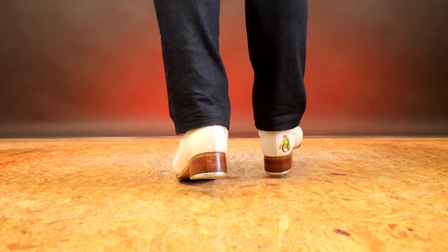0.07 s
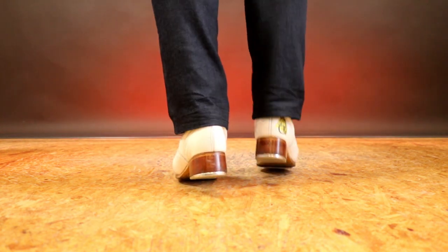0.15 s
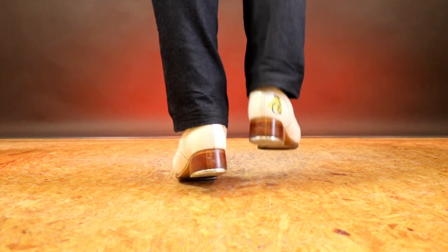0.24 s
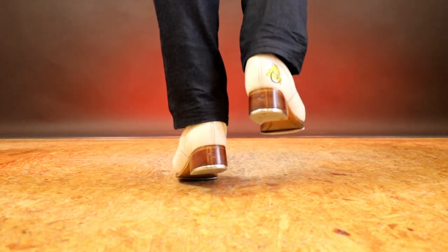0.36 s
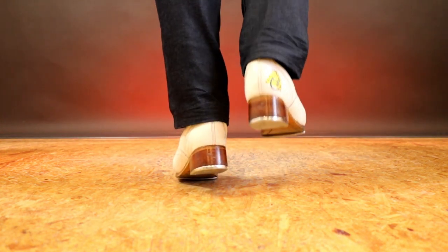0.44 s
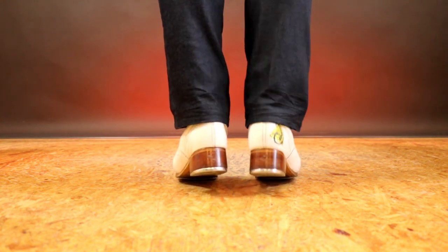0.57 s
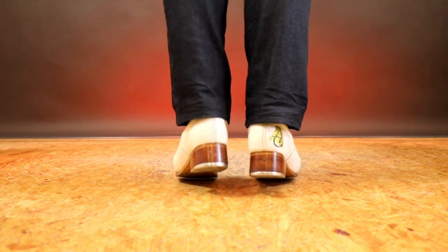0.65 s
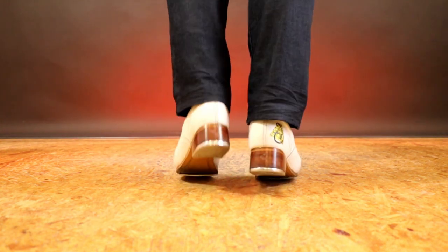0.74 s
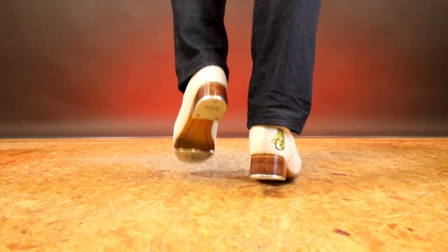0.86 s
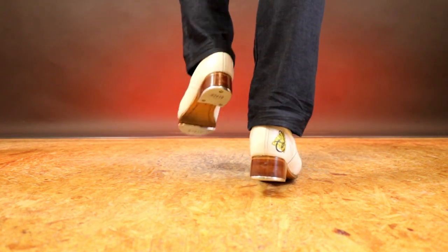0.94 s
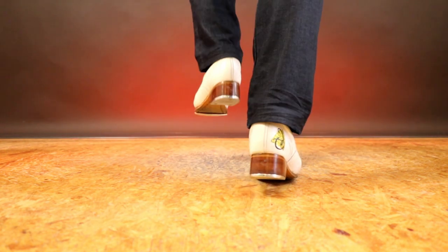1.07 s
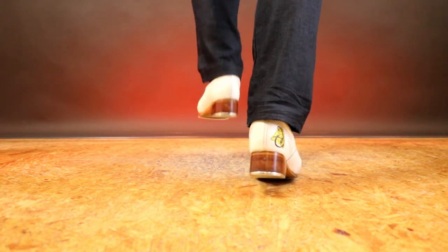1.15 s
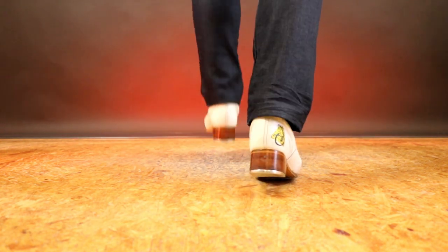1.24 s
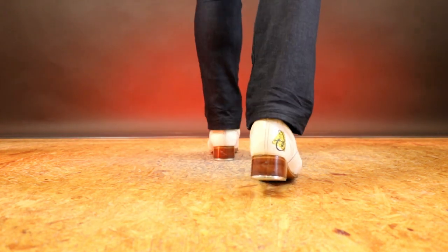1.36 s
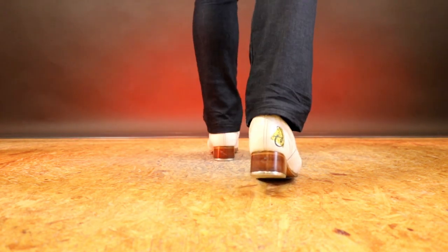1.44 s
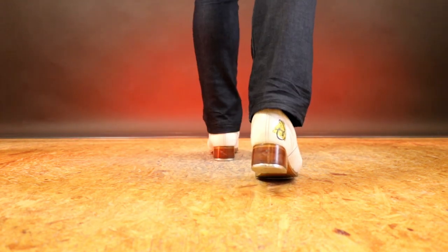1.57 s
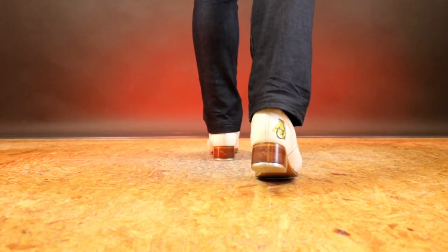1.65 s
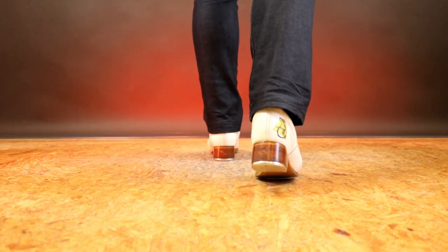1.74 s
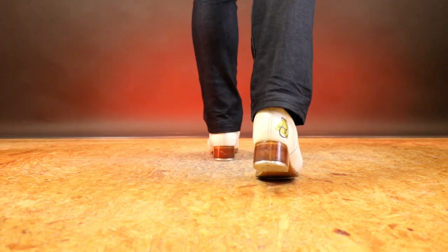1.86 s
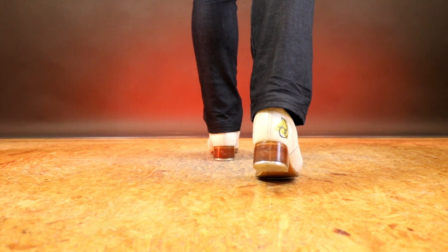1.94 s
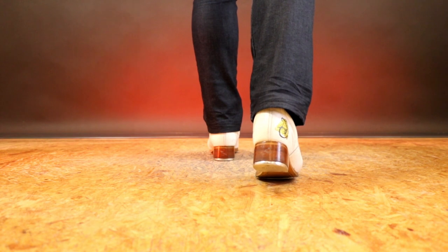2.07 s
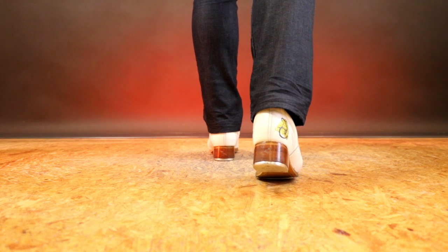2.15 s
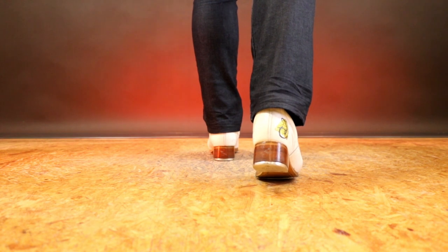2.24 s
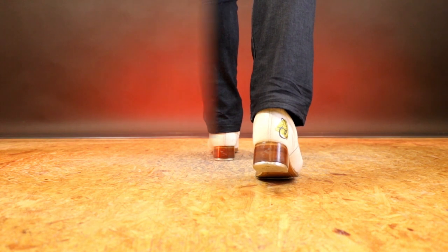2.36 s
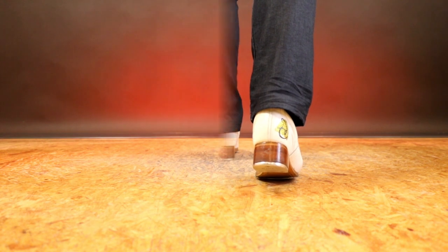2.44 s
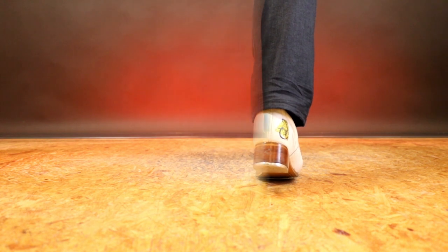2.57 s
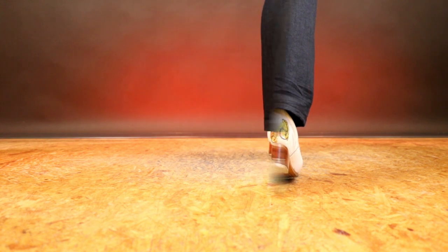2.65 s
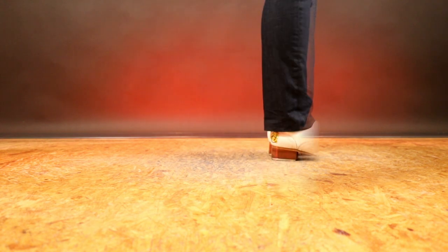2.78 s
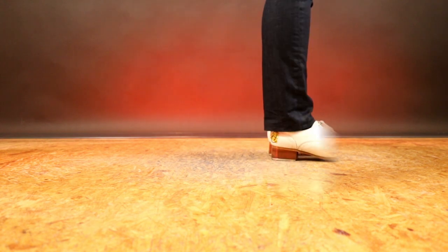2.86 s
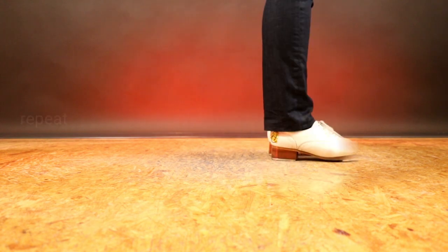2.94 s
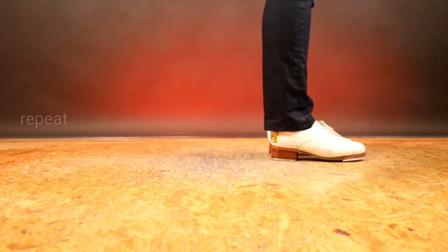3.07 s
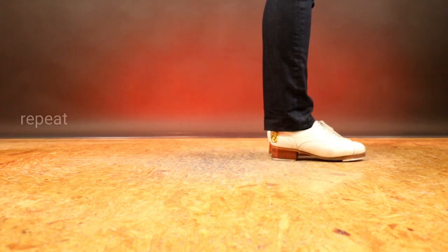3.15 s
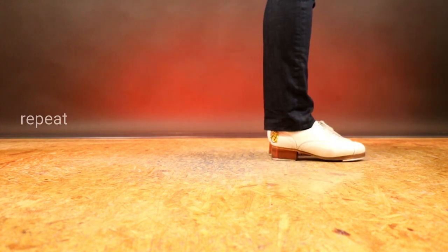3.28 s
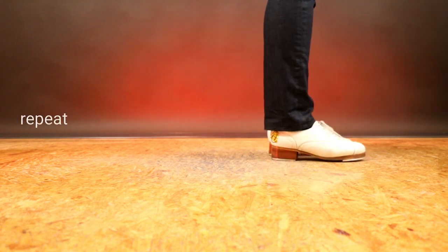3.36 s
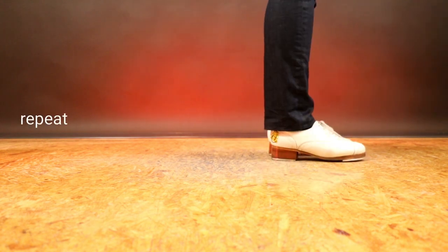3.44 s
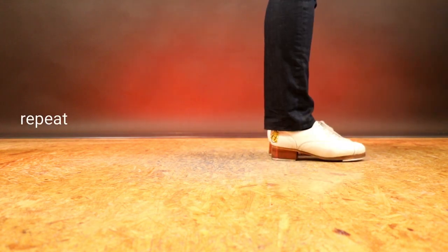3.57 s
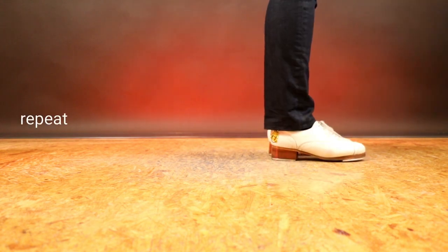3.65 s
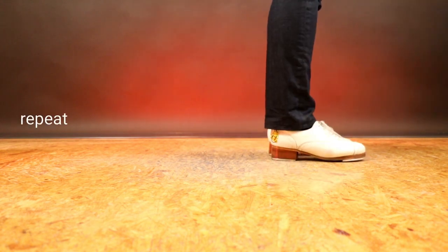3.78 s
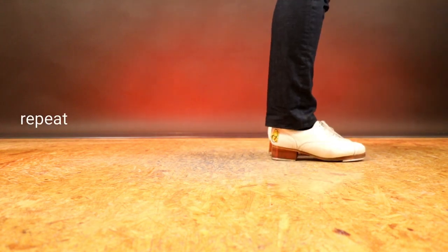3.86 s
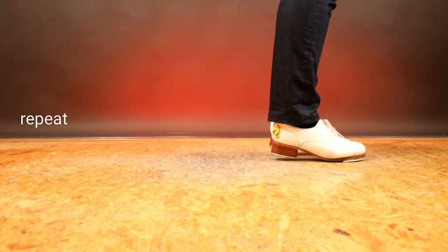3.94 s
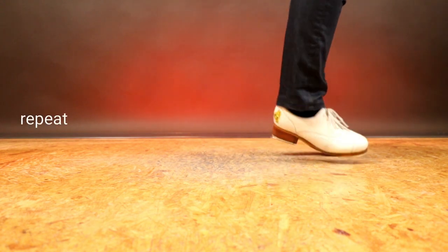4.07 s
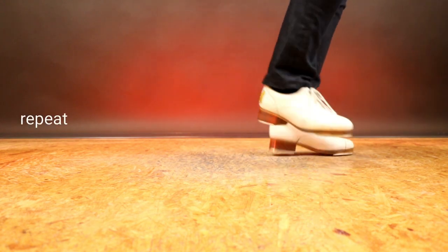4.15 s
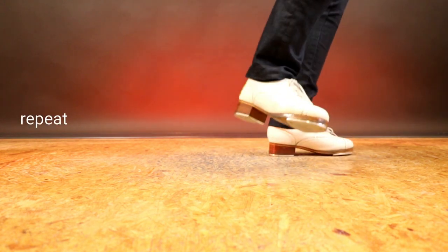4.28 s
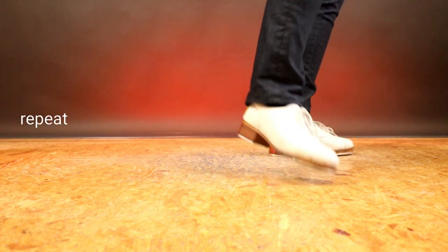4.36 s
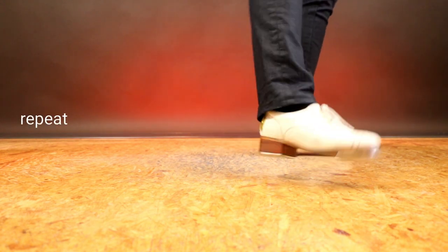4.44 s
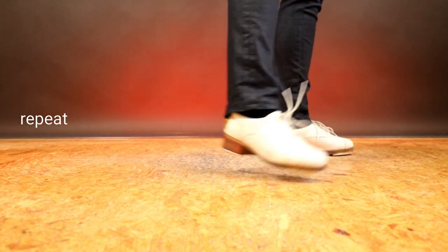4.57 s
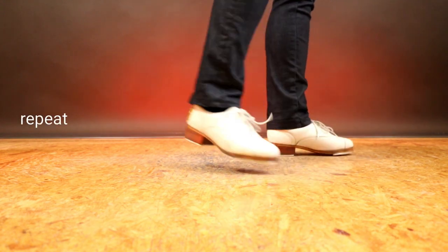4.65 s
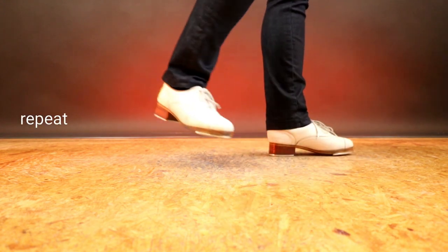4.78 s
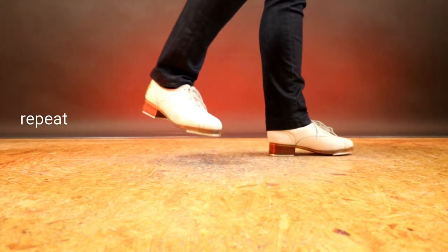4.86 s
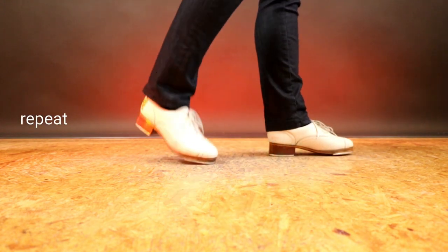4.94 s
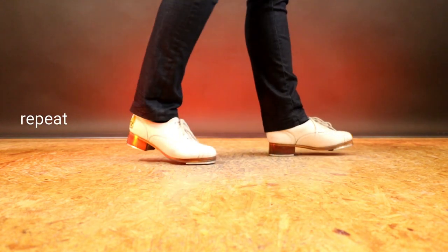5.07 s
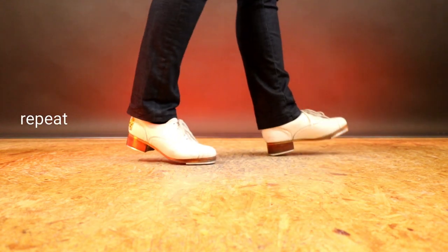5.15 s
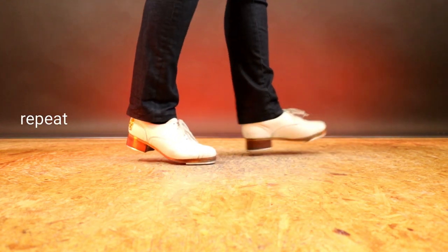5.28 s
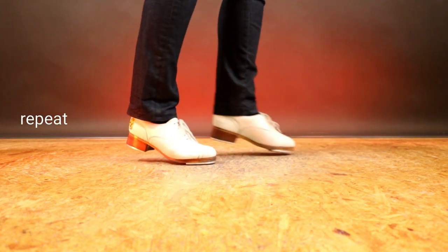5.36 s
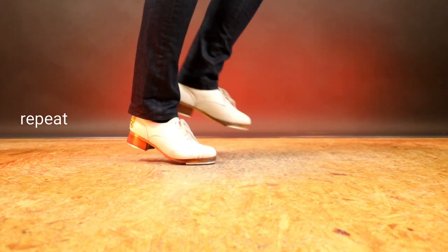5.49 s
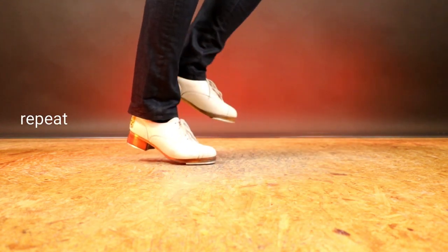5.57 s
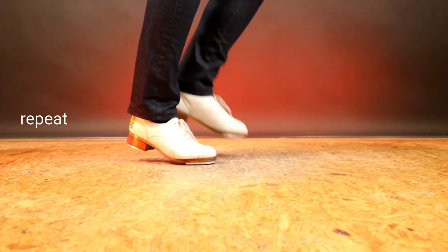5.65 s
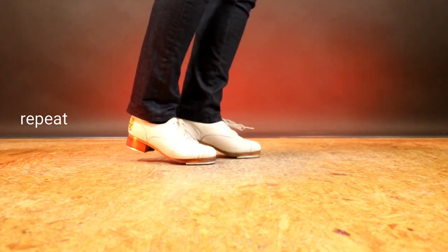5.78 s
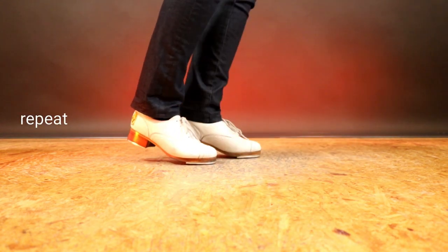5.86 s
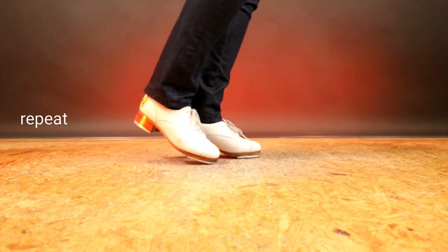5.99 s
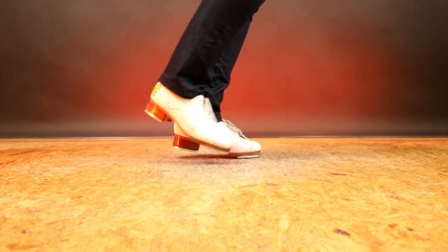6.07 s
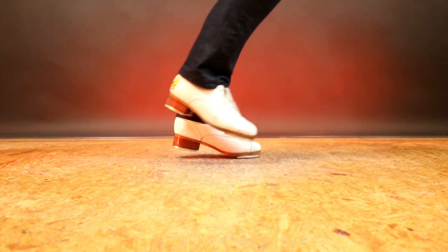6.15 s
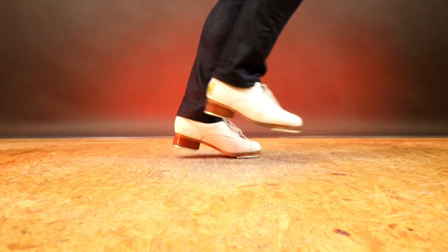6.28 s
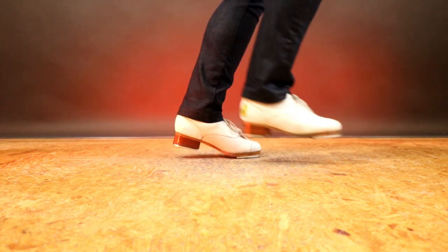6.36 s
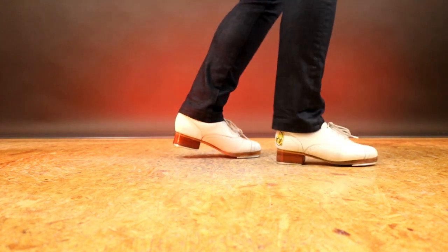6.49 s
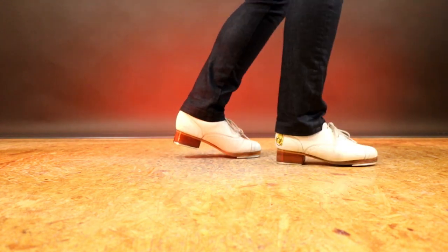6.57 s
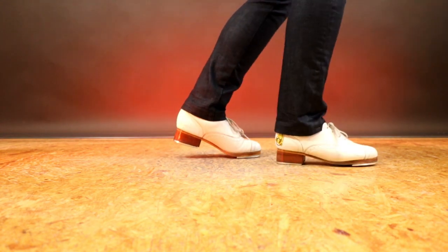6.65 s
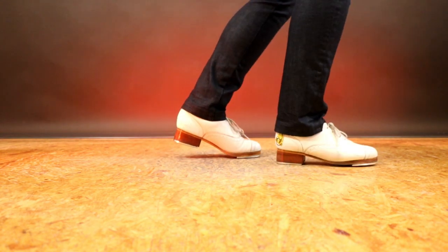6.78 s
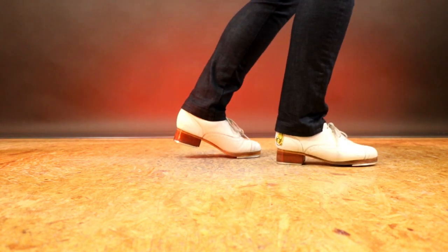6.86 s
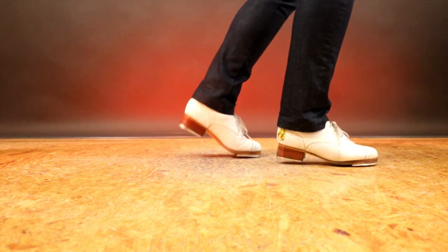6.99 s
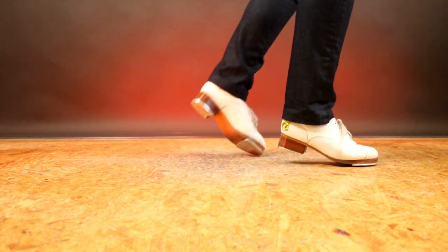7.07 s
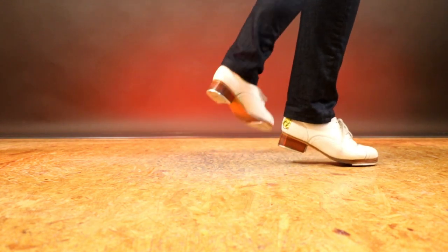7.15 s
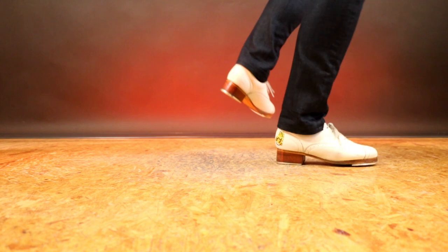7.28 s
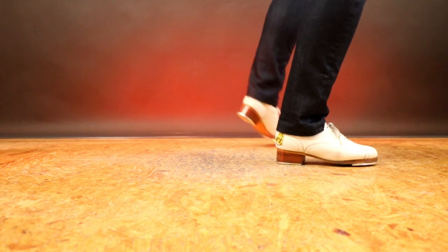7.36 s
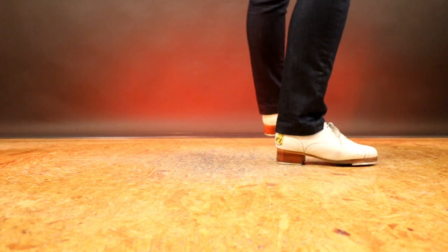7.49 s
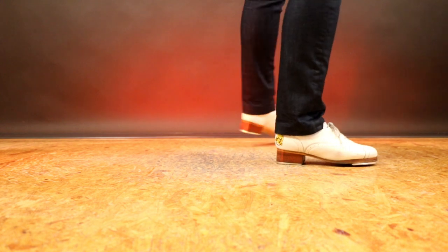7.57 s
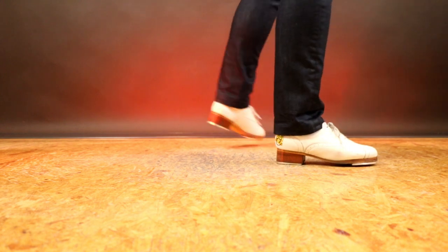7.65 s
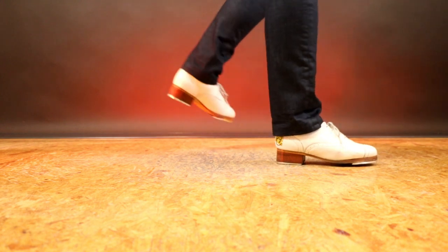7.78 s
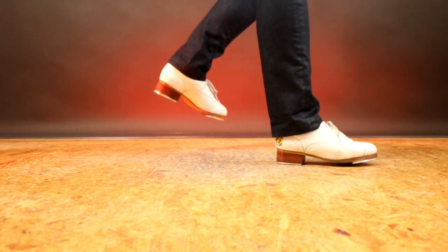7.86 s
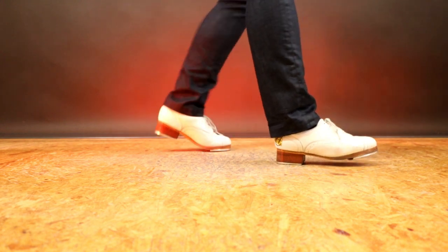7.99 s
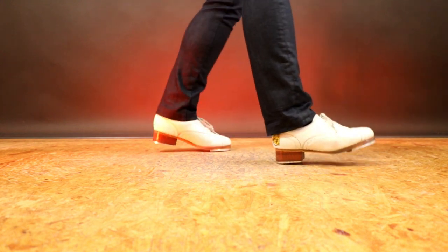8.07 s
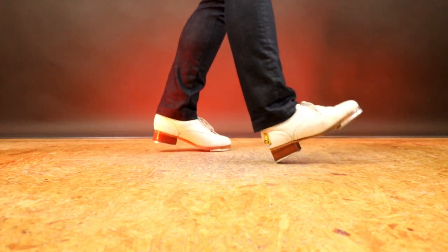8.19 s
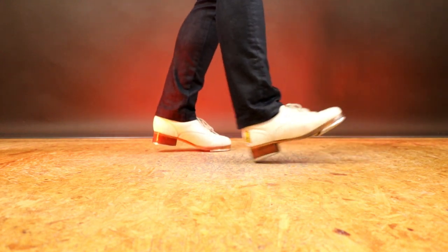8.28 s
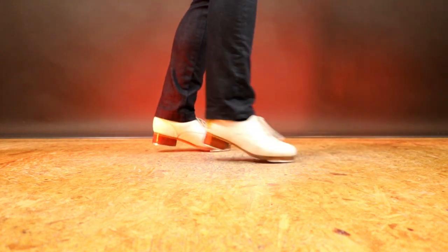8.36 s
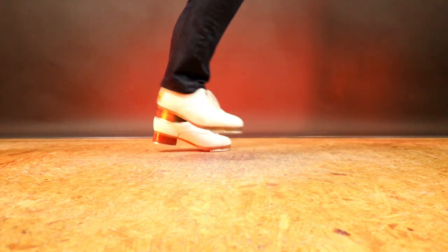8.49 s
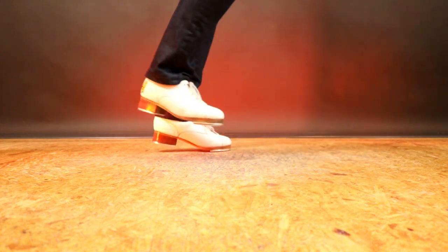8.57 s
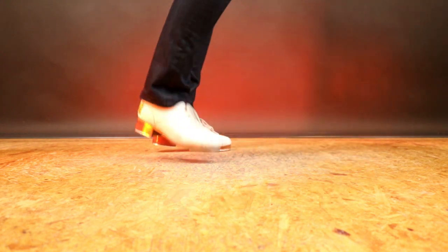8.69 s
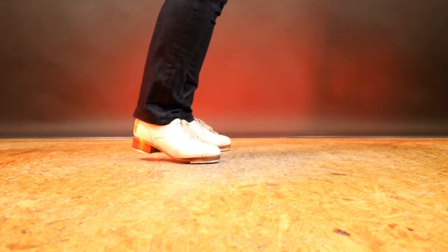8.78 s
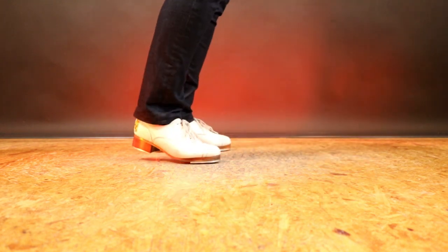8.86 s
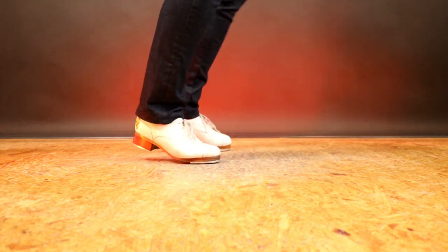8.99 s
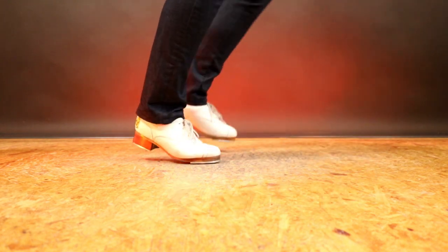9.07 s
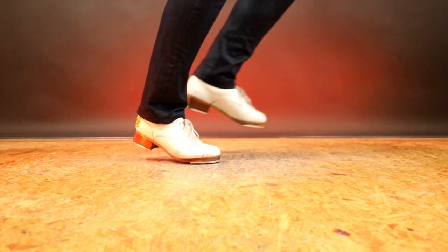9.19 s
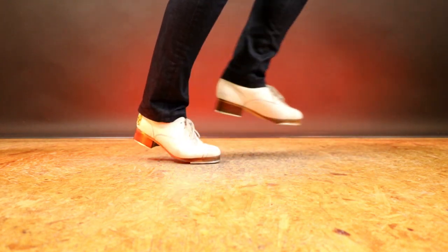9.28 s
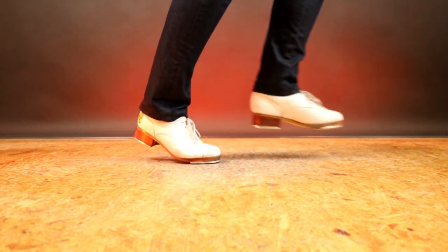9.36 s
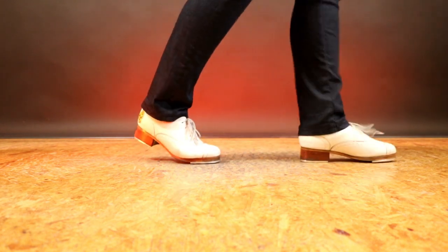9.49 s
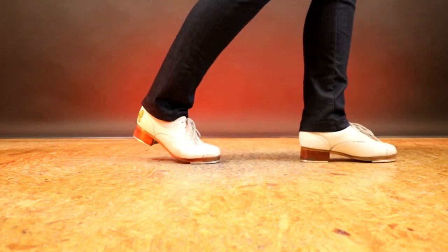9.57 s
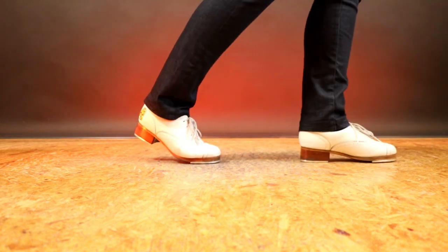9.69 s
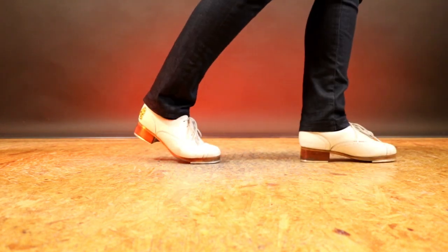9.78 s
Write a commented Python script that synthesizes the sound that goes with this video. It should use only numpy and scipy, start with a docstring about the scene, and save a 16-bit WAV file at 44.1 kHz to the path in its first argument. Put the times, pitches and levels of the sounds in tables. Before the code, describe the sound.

Close stereo pickup of tap shoes on a wooden studio floor. Two single taps and a tight double stamp come first, then nearly three seconds of quiet with a faint sliding sole. Crisp, irregularly spaced taps follow, some stamps landing as fast toe-heel doubles with a light plate rattle. Brief rubbery squeaks slip between them. Each strike rings about half a second in the room over faint hiss.

```python
"""A tap dancer strikes a wooden studio floor with metal-tipped shoes, close to a stereo microphone.
Each tap is one short filtered pulse, coloured by boards and plate; hard ones overload the recorder.
Early echoes and a tail of decaying noise make the room ring on. Some stamps land twice, toe then heel.
Between taps a sole squeaks (wobbling harmonics blurred by noise) and slides (grainy noise).
Plates rattle lightly, over steady hiss and a faint mains hum."""
import sys
import numpy as np
from scipy import signal
from scipy.fft import rfft, irfft
from scipy.io import wavfile
from scipy.ndimage import uniform_filter1d

SR = 44100
rng = np.random.default_rng(int(sys.argv[2]) if len(sys.argv) > 2 else 0)


def waveform_to_disk(signal):
    """Save audio, clipped to [-1, 1], as 16-bit WAV at the path in sys.argv[1]."""
    frames = np.transpose(np.atleast_2d(signal))
    scaled = np.clip(frames, -1, 1) * 32767
    samples = np.round(scaled).astype(np.int16)
    wavfile.write(sys.argv[1], SR, samples)


N = 433503  # length of the scene in samples
SIZE, LEAD = 4096, 128  # samples in a pulse, and samples ahead of its contact
HZ = np.fft.rfftfreq(SIZE, 1 / SR)

# Colour of metal on wood, common to all taps. Each row: frequency in Hz, level in dB.
BLOW_COLOUR = [(40, -14.5), (110, -1), (170, 1.5), (260, 15.5), (500, 21), (800, 17.5), (1300, 17.5),
               (2000, 21), (3200, 16), (4500, 9), (7000, 9.5), (10000, -1), (15000, -8)]
# How alike left and right are in the room. Each row: frequency in Hz, likeness from -1 to 1.
ROOM_LIKENESS = [(100, 0.63), (300, 0.33), (600, 0.37), (1000, 0.48), (2400, 0.48), (4000, .05),
                 (10000, 0.032)]


def gain_of(db):
    """Decibels to amplitude."""
    return 10 ** (np.asarray(db) / 20)


def evened(x):
    """Scales to rms 1."""
    return x / np.sqrt(np.mean(x ** 2) + 1e-20)


def read(points, hz):
    """Joins (Hz, value) points on a log-frequency axis."""
    f, value = np.transpose(points)
    return np.interp(np.log(hz + 1), np.log(f + 1), value)


def add(mix, s, sound):
    """Adds a sound that starts at time s; whatever falls outside the scene is cut off."""
    start = round(s * SR)
    part, sound = mix[:, max(start, 0):], sound[:, max(-start, 0):]
    part[:, :sound.shape[1]] += sound[:, :part.shape[1]]


def causal(db):
    """Minimum-phase spectrum: the quickest-dying pulse that has these levels on HZ."""
    log_gain = np.log(gain_of(np.maximum(db, -100)))
    both_sides = np.r_[log_gain, log_gain[-2:0:-1]]
    return np.exp(np.conj(signal.hilbert(both_sides)))[:len(HZ)]


def noise_pair(length, colour, likeness):
    """Two channels of coloured noise, the right one partly a copy of the left."""
    hz = np.fft.rfftfreq(length, 1 / SR)
    a, b = rfft(rng.standard_normal((2, length)))
    same = np.clip(read(likeness, hz), -1, 1)
    pair = np.array([a, same * a + np.sqrt(1 - same ** 2) * b])
    return irfft(pair * gain_of(read(colour, hz)), length)


def background(hiss_db=-59.5, hum_hz=50, hum_db=-76):
    """Steady hiss, shaped noise, with a faint mains hum, a pure sine; both levels are rms."""
    # Hiss colour. Each row: frequency in Hz, relative level in dB.
    hiss_colour = [(20, -14), (35, -8.5), (55, -6), (80, -13.5), (120, -12), (190, -9.5), (300, -12.5),
                   (600, -15.5), (1200, -15.5), (10000, -17.5), (16000, -20.5)]
    # How alike the hiss is left and right. Each row: frequency in Hz, likeness from -1 to 1.
    hiss_likeness = [(60, 0.011), (180, 0.14), (550, 0.54), (1650, 0.091), (4970, 0.062), (15000, 0.0039)]
    hiss = evened(noise_pair(N, hiss_colour, hiss_likeness))
    hum = np.sqrt(2) * np.sin(2 * np.pi * hum_hz * np.arange(N) / SR)
    return gain_of(hiss_db) * hiss + gain_of(hum_db) * hum


def room_tail(gap_s=0.0099, build_s=0.062, held_back=0.52, left_db=.5):
    """The studio's diffuse ring: noise that dies at its own rate in each band, drawn anew on every call."""
    # Reverberation time. Each row: frequency in Hz, time to fall by 60 dB in seconds.
    t60_points = [(60, 0.31), (150, 0.67), (300, 0.49), (1000, 0.51), (2500, 0.51), (5000, .52),
                  (9000, 0.4), (16000, 0.083)]
    # Colour of the ring. Each row: frequency in Hz, relative level in dB.
    room_colour = [(60, -2.5), (150, 8.5), (300, 0.5), (700, 2), (1500, 1.5), (3000, 2), (7000, -2.5),
                   (15000, 1)]
    noise = noise_pair(8 * SIZE, room_colour, ROOM_LIKENESS)
    hz, t, z = signal.stft(noise, SR, nperseg=256)
    t60 = read(t60_points, hz)[:, None]
    even_energy = np.sqrt(2 * np.log(1000) / (t60 * SR))  # long and short rings carry the same energy
    decay = np.exp(-np.log(1000) * t / t60) * even_energy
    tail = signal.istft(z * decay, SR, nperseg=256)[1]
    t = np.arange(tail.shape[1]) / SR
    # the far walls need a moment to fill the room
    swell = np.minimum(t / gap_s, 1) * (1 - held_back * np.exp(-t / build_s))
    return tail * swell * gain_of([[left_db], [-left_db]])


def near_paths(spread_s=.0003, runner_db=-9, runner_s=0.00064, runner_hz=2600, grit_db=0, grit_s=0.0015):
    """Left and right spectra of the direct sound, its board waves, its grit and the first echoes."""
    # Colour of the direct path. Each row: frequency in Hz, level in dB.
    near_colour = [(40, 0.5), (120, -7.5), (280, 0), (520, 7), (820, 6.5), (1120, 6.5), (1400, -0.5),
                   (1900, 6), (3200, 3), (5500, -6.5), (9000, -0.5), (16000, -2.5)]
    # First echoes, the strongest from the left. Each row: nominal delay in seconds, left dB, right dB.
    echoes = [(.0036, -6.5, -19), (.0064, -19, -25), (.0095, -28, -23), (.0155, -21.5, -29),
              (0.0196, -28.5, -21.5), (.028, -25.5, -26.5)]
    # Grinding of metal on wood. Each row: frequency in Hz, relative level in dB.
    grit_colour = [(100, -19), (700, -9), (2000, -5), (4000, -0.5), (8000, -1), (16000, -5)]
    # How alike the grinding is left and right. Each row: frequency in Hz, likeness from -1 to 1.
    grit_likeness = [(100, 0.88), (2000, .9), (4500, 0.7), (9000, 0.37)]
    paths = np.ones((2, 1))
    for delay, left_db, right_db in echoes:
        delay = delay * rng.uniform(0.89, 1.05)  # the feet move about
        paths = paths + gain_of([[left_db], [right_db]]) * np.exp(-2j * np.pi * HZ * delay)
    # bending waves in the boards outrun the air: two growing swings come ahead of the crack
    early = np.exp(2j * np.pi * HZ * runner_s)
    ahead = gain_of(runner_db) * early / (1 + (HZ / runner_hz) ** 6)
    # they carry the bass more slowly: spread_s is the delay at 1 kHz
    bending = np.exp(-4j * np.pi * spread_s * np.sqrt(1000 * HZ))
    # the plate grinds on the wood for about a millisecond
    grit = noise_pair(SIZE, grit_colour, grit_likeness) * np.exp(-np.arange(SIZE) / (grit_s * SR))
    grit = gain_of(grit_db) * rfft(grit) / np.linalg.norm(grit[0])
    return paths * (bending * (1 + ahead + ahead ** 2) + grit) * causal(read(near_colour, HZ))


def blow(db, direct_db, room_db):
    """A pulse of the given spectrum, heard directly and through the room; contact comes LEAD samples in."""
    pulse = causal(db) * np.exp(-2j * np.pi * HZ * LEAD / SR)
    sound = gain_of(room_db) * signal.fftconvolve(irfft(pulse)[None], room_tail(), axes=1)
    sound[:, :SIZE] += gain_of(direct_db) * irfft(pulse * near_paths())
    return sound


def slide(start_s=3.74, attack_s=.06, hold_s=0.17, release_s=0.22, top_db=-57.5, grain_db=3):
    """The shoe slides into place: friction noise whose level follows the pressure and a random grain."""
    # Colour of the friction. Each row: frequency in Hz, relative level in dB.
    slide_colour = [(100, -36), (400, -1.5), (1500, 2.5), (2700, -1.5), (4200, 4.5), (6000, -3),
                    (9000, -6.5), (16000, -25)]
    corners = np.cumsum([start_s, attack_s, hold_s, release_s])
    pressure = np.interp(np.arange(N) / SR, corners, [0, 1, 1, 0])
    grain = evened(uniform_filter1d(rng.standard_normal(N), size=150))
    friction = evened(noise_pair(N, slide_colour, ROOM_LIKENESS))
    return friction * pressure * gain_of(top_db + grain_db * grain)


def squeak(length_s, middle_hz, sag, top_db, roughness, jitter=0.15, overtone_db=-10,
           scrape_width=0.22, scrape_share=1.0, peak_at=0.9, fade_db=-16, let_go_rough=.6):
    """The sole sticks and slips at a pitch that arches or dips; as it lets go the slips blur into a scrape."""
    t = np.arange(0, length_s, 1 / SR)
    u = t / length_s
    hz = middle_hz * (1 - sag * (2 * u - 1) ** 4)
    # loudest at the share peak_at of its length, fade_db lower at both ends
    level_db = top_db + fade_db * np.interp(u, [0, np.clip(peak_at, 0, 1), 1], [1, 0, 1]) ** 2
    rough = roughness + let_go_rough * u ** 8
    wobble = evened(uniform_filter1d(rng.standard_normal(len(t)), size=30))
    turns = np.cumsum(hz * (1 + jitter * rough * wobble)) / SR
    # three harmonics, falling by overtone_db per octave
    slips = sum(gain_of(overtone_db * np.log2(k)) * np.sin(2 * np.pi * k * turns) for k in range(1, 4))
    band = signal.iirpeak(hz.mean(), 1 / scrape_width, fs=SR)  # width as a share of the pitch
    scrape = signal.lfilter(*band, rng.standard_normal(len(t)))
    share = np.clip(scrape_share * rough, 0, 1)
    sound = np.sqrt(1 - share ** 2) * evened(slips) + share * evened(scrape)
    return (gain_of(level_db) * sound)[None]


def sole(slide_room_db=-6, squeak_room_db=-10):
    """Friction of the shoe on the boards: a soft grainy slide and the squeaks, with the room around them."""
    # Squeaks of the pivoting sole. Each row: start in seconds, length in seconds, pitch in the middle in Hz,
    # share by which the pitch sags at the ends, top level in dB, roughness from 0 to 1.
    squeak_rows = [(5.191, 0.015, 1400, 0.16, -46, 0.85), (6.873, 0.077, 1465, 0.22, -44.5, 0.25),
                   (6.959, 0.034, 1293, -0.18, -46.5, 0.55), (8.208, 0.058, 1374, .06, -38.5, 0.7)]
    sliding = slide()
    squeaks = np.zeros((2, N))
    for s, *settings in squeak_rows:
        add(squeaks, s, squeak(*settings))
    to_room = gain_of(slide_room_db) * sliding + gain_of(squeak_room_db) * squeaks
    return sliding + squeaks + signal.fftconvolve(to_room, room_tail(), axes=1)[:, :N]


def ticks(skirt_db=4):
    """A plate rattles after a stamp, or just touches the floor: a pulse with one broad spectral hump."""
    # Light touches and rattles. Each row: contact in seconds, level of the hump in dB, its centre in Hz.
    tick_rows = [(3.854, -20.5, 1511), (3.88, -24, 1500), (6.4213, 11, 2800), (6.4373, -10, 5340),
                 (6.9968, -18.5, 2500), (9.468, 7.5, 3500), (9.4875, 6, 5000)]
    mix = np.zeros((2, N))
    for s, level_db, hz in tick_rows:
        octaves_off = np.log2((HZ + 1) / hz)
        hump = level_db - skirt_db * octaves_off ** 2
        add(mix, s - LEAD / SR, blow(hump, direct_db=-5, room_db=-1.0))
    return mix


def low_swing(db, rise_s=.0008):
    """A short one-sided low swing under each tap, as from lopsided overload of the recorder."""
    u = np.arange(SIZE) / (rise_s * SR)
    swing = u * np.exp(-u)
    return -gain_of(db) * (swing / swing.sum())[None]


def tap_colour(force_db, thud_db, edge_db, resonances, thud_hz=400, edge_hz=4000, width_hz=100, widening=.13):
    """Body weight brings out the floor's thud, a hard contact the treble; the spot struck picks the resonances."""
    thud = thud_db / (1 + (HZ / thud_hz) ** 3)
    edge = edge_db * (1 - 1 / (1 + (HZ / edge_hz) ** 3))
    db = read(BLOW_COLOUR, HZ) + force_db + thud + edge
    for hz, peak_db in np.reshape(resonances, (-1, 2)):
        db = db + peak_db * np.exp(-((HZ - hz) / (width_hz + widening * hz)) ** 2)
    return db


def taps(room_db=2.0, earlier_s=-.27, earlier_db=-1):
    """Toe and heel plates hit the boards: a coloured blow and a low one-sided swing for each contact."""
    # Taps. Each row: contact in seconds, way the shoe lands, force in dB, floor thud in dB, hard edge in dB,
    # direct sound in dB, low swing in dB, factor on the pitch of the resonances, then the frequency in Hz
    # and the level in dB of the one resonance that the spot struck lifts or mutes.
    tap_rows = [(0.0962, "toe tip", 0.5, -16, -1.5, -3.5, 7.5, 0.99, 334, 3.5),
                (0.495, "toe step", 2, -3, -0.5, -5, 9.5, 0.97, 8200, -1),
                (1.247, "flat plate", -6.5, -3, -8.5, 7.5, 2, 1.2, 4600, 7),
                (1.2611, "full heel", -3.5, 11, 9, -7, -4.5, 1.006, 4520, 4),
                (4.1614, "heel edge", -11.5, 20, 9.5, -2, -4.5, 1, 7150, 6),
                (4.3684, "toe brush", -9, 7.5, 8, -2, -11.5, 1.04, 1240, 2.5),
                (4.583, "toe tip", -1.5, -13.5, 1, -0.5, 12.5, 0.99, 880, -3.5),
                (4.9324, "flat plate", -0.4, 0.5, 0.1, -3, 15, 1, 740, -2.2),
                (5.3147, "toe brush", -7.5, 1.5, 9.5, -0.5, -8, 1.04, 6950, 3),
                (5.6785, "ball", 2.5, -4.6, 3, -2.5, -13, 0.89, 2860, -11),
                (6.412, "flat plate", -2.5, -7, -24, 2.5, 9, 1.37, 5140, 15),
                (6.4289, "full heel", -5.5, 11, 14.5, -8.5, -4.5, 1.07, 4925, -6.5),
                (7.2071, "ball", -8, 11, 3.5, -0.5, -13.5, 1.05, 2510, -11),
                (7.3572, "flat plate", -3.5, -1, -3, 1, -6.5, 1.1, 5700, 5.5),
                (7.5877, "ball", -3.5, -8.5, 3.5, 1.5, -18, .97, 760, -4),
                (7.9463, "flat plate", 2, -0.5, 0.5, -3.5, 17, 1, 5600, -8),
                (8.3383, "toe tip", -0.1, -11.5, 2, 0, 15.5, 1.11, 4180, -4),
                (8.702, "toe step", 1.5, -2.5, -0.5, -0.5, 25, 1.04, 1900, -1),
                (9.4593, "flat plate", -9.5, 2.5, -0.5, 1.5, -13.5, 0.85, 713, 13),
                (9.4795, "full heel", -4, 6.5, 10.5, -6.5, -6, 0.93, 1550, -1)]
    # Resonances of plate and boards for each way of landing. Each row: frequency in Hz, lift in dB.
    contacts = { "toe tip": [(185, 11), (389, 5.3), (2540, 5.6), (3766, 7.2), (6310, 1.7)],
                "toe step": [(386, 2), (1165, 1.5), (3408, 5.3), (6258, 7.4)], "toe brush": [(347, 4.4),
                (1312, 10.2), (1800, 8.8), (2449, 8.2), (4024, 6.8)], "ball": [(300, 4.4), (837, 2.2),
                (1336, 4), (3560, 8.5), (4817, 1.2)], "flat plate": [(331, 3.5), (738, 0.83), (1264, 4.7),
                (6853, 4.5), (11429, 2.9)], "heel edge": [(310, 5.9), (739, 8.9), (1326, 17), (2403, 6.8),
                (5046, 14)], "full heel": [(238, 11), (885, 7.1), (2885, 5.5), (4463, 10.6), (7258, 4)]}
    mix = np.zeros((2, N))
    for s, contact, force_db, thud_db, edge_db, direct_db, swing_db, pitch, spot_hz, spot_db in tap_rows:
        resonances = [(hz * pitch, db) for hz, db in contacts[contact]]
        resonances.append((spot_hz, spot_db))
        colour = tap_colour(force_db, thud_db, edge_db, resonances)
        add(mix, s - LEAD / SR, blow(colour, direct_db, room_db))
        add(mix, s, low_swing(swing_db))
    # the room still rings from a tap before the start
    add(mix, earlier_s, blow(read(BLOW_COLOUR, HZ) + earlier_db, 0, room_db))
    return mix


def scene():
    """Everything in the studio."""
    return taps() + ticks() + sole() + background()


def record(dry, edge_hz=16000):
    """The recorder clips whatever exceeds full scale, then a low-pass limits the band."""
    clipped = np.clip(dry, -1, 1)
    low_pass = signal.firwin(255, edge_hz, window=("kaiser", 8), fs=SR)
    return signal.oaconvolve(clipped, low_pass[None], "same")


dry = scene()
out = record(dry)
waveform_to_disk(out)
```